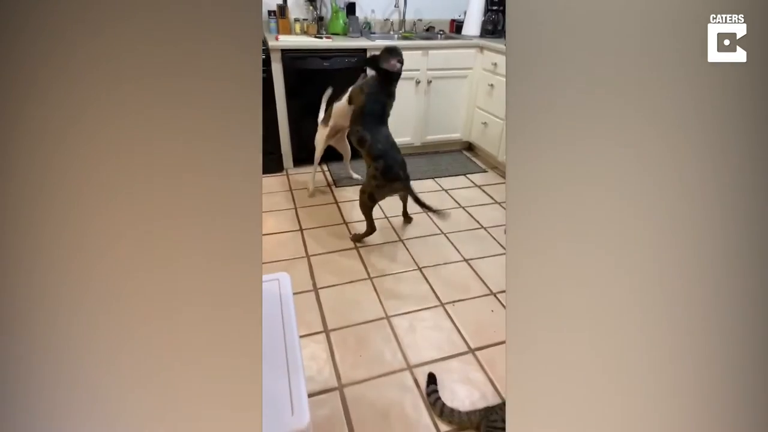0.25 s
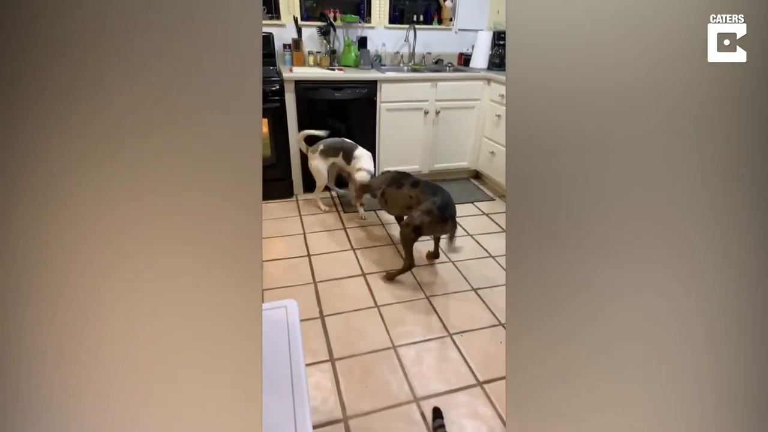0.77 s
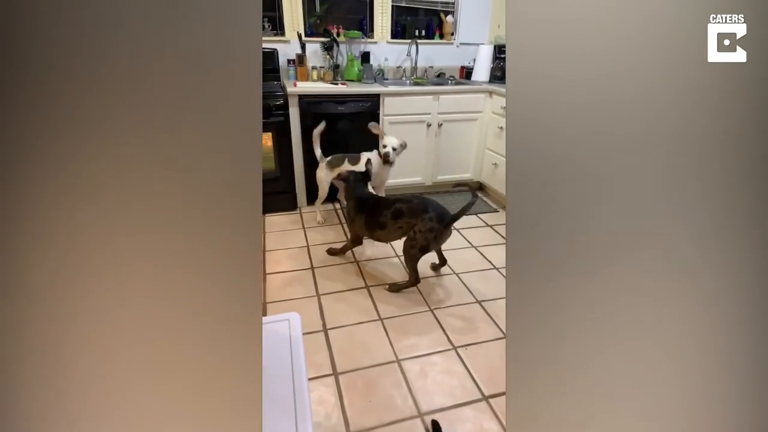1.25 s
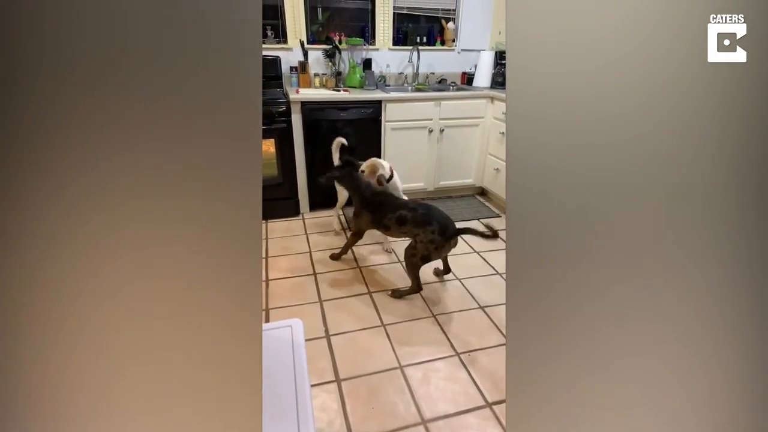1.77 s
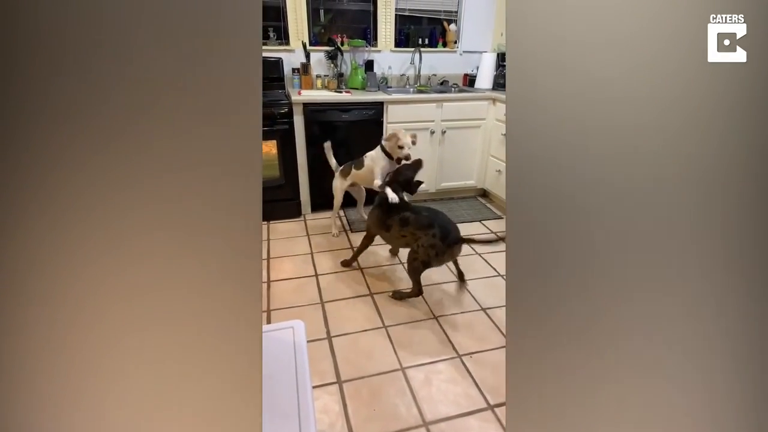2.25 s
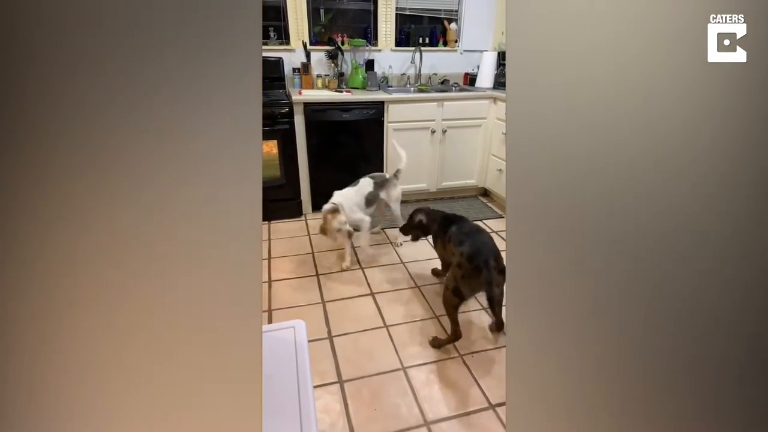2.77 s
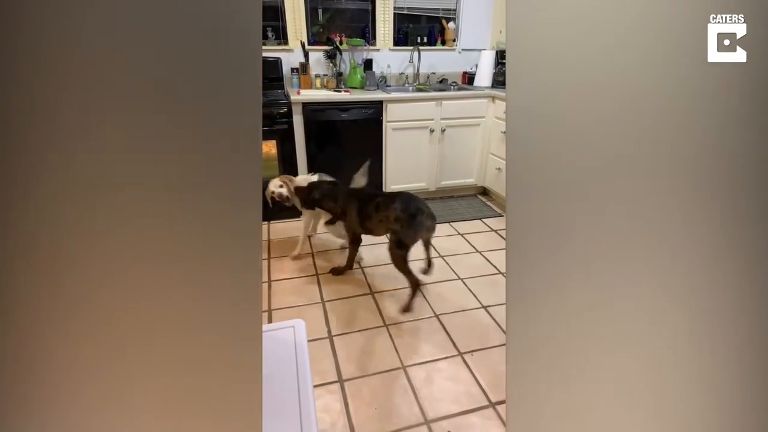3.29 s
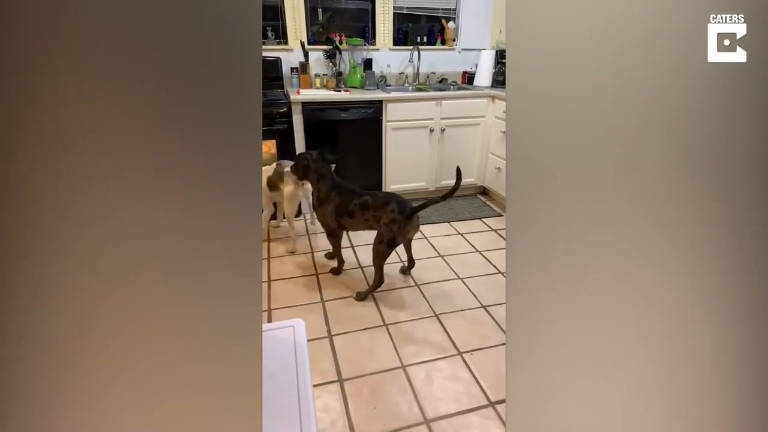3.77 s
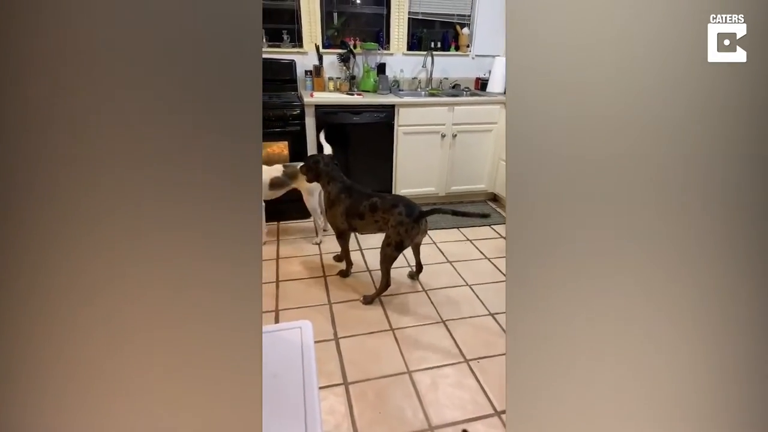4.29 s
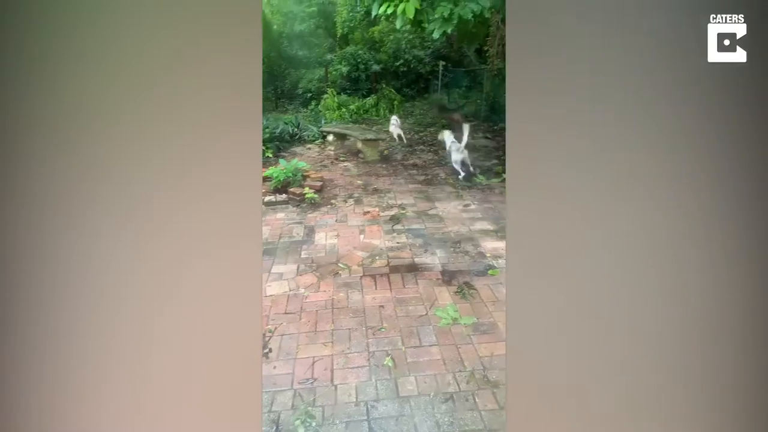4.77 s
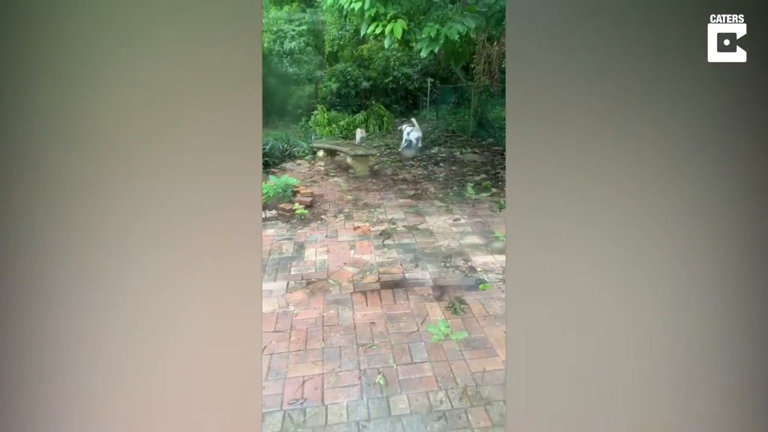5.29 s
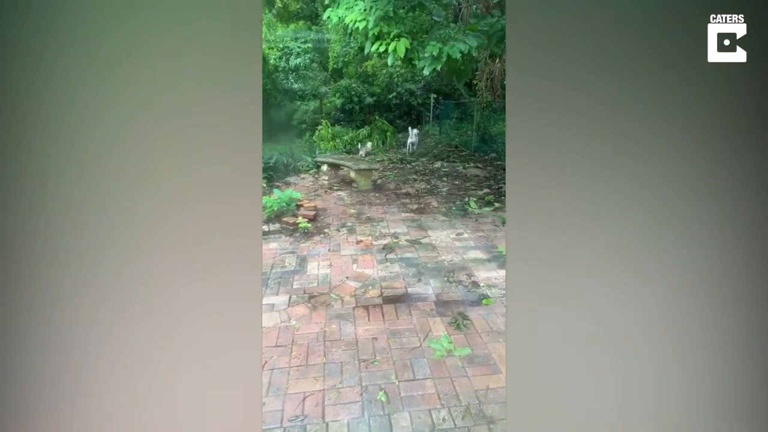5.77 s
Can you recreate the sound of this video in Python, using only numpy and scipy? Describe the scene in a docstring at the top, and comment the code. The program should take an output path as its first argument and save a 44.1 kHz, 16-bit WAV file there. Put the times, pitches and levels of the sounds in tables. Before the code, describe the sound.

Two dogs play-fight on a tiled kitchen floor near the microphone. Claws clack in uneven bursts, paws thud and slide, and brief, thin whimpers slip in between. Landings ring in hollow cabinets, with a short room echo and a low appliance hum. The kitchen fades out, and after an instant of silence a quiet yard cuts in with a droning machine, two distant yelps and faint rustling leaves.

```python
"""Claws clack and paws scuff on kitchen tile as two dogs wrestle, one giving thin, whistling whimpers.
Nails tick and ring, pads thud, and each landing booms in the hollow cabinets; the hard walls echo
and an appliance hums underneath. The kitchen fades out and, after a breath of silence, a quiet yard
cuts in: a droning machine, two far yelps and dogs bounding through rustling leaves."""
import sys
import numpy as np
from scipy import signal
from scipy.fft import rfft, irfft, next_fast_len
from scipy.io import wavfile
from scipy.ndimage import uniform_filter1d

SR = 44100
rng = np.random.default_rng(int(sys.argv[2]) if len(sys.argv) > 2 else 0)


def materialize(psi):
    """Save the field psi as 16-bit PCM at rate SR to the path in sys.argv[1].

    A 1-D psi becomes a single channel; in a 2-D psi each row is a channel.
    """
    bounded = np.clip(np.atleast_2d(psi).T, -1, 1)
    quanta = np.round(bounded * 32767).astype(np.int16)
    wavfile.write(sys.argv[1], SR, quanta)


N = 266364
TIME = np.arange(N) / SR

# Event levels are pre-fader: each layer gets its own gain in the mix.
# claws striking tile: (time [s], level [dB], scrape time [s], dullness as knock over tick [dB])
CLAW_HITS = [(0.001, -50.5, 0.0041, 15), (0.175, -47, 0.0044, -1), (0.244, -58.5, .009, 2),
             (0.3271, -62.5, .009, -17), (0.362, -62.5, 0.0071, 15.5), (0.585, -37, 0.018, 2.5),
             (0.659, -37, 0.0068, 6), (0.7548, -35.5, 0.004, -2), (1.0178, -25, 0.0072, -1),
             (1.178, -54, 0.0085, 14), (1.262, -65, 0.0078, 15.5), (1.379, -56.5, 0.012, 10.5),
             (1.4247, -62, 0.0072, -15), (1.4665, -49, 0.0035, 8.5), (1.66, -62, 0.08, 4),
             (2.0228, -35.5, 0.0094, -2), (2.132, -29, 0.0071, -1.5), (2.523, -53.5, 0.017, 6),
             (2.643, -33.5, 0.0046, 4.5), (2.679, -51, 0.011, 17), (2.765, -51.5, 0.018, -14),
             (2.793, -34.5, 0.013, 6.5), (3.147, -45, 0.0069, 2.5), (3.3421, -33, 0.0068, 0),
             (3.376, -45, 0.009, 15), (3.424, -47, 0.0058, 9), (3.4809, -35, 0.0015, 5),
             (3.526, -34, 0.0076, 2.5), (3.6201, -47.5, .011, 5.5), (3.6687, -47, 0.0092, 3),
             (3.7298, -42.5, 0.0058, 3), (3.83, -36, 0.0063, 2.5), (3.842, -43.5, 0.0062, 3.5),
             (4.2708, -65.5, .007, 21.5)]
# paw pads landing: (time [s], level [dB], resonance [Hz])
PAW_LANDINGS = [(0.147, -40, 406), (0.593, -44, 290), (0.6627, -43.5, 317), (1.0289, -39, 340),
                (1.2574, -50.5, 500), (1.468, -46.5, 507), (1.491, -49.5, 630), (2.1393, -42.5, 336),
                (2.351, -47.5, 330), (2.672, -47.5, 390), (2.8007, -48.5, 288), (2.956, -41.5, 332),
                (3.34, -50.5, 368), (3.423, -46, 338), (3.482, -45, 510), (3.654, -47.5, 650),
                (3.951, -57, 400)]
# feet and coats sliding: (peak time [s], swell time [s], swish level [dB], grit level [dB])
SLIDES = [(0.06, 0.14, -71, -61), (0.201, 0.16, -52, -64), (0.50, 0.052, -54, -70), (0.70, 0.084, -47, -69),
          (0.88, 0.056, -57, -60.5), (1.119, 0.09, -55, -50), (1.28, 0.017, -47, -57),
          (1.405, 0.043, -51, -67), (1.70, .04, -52, -59.5), (1.954, 0.084, -53.5, -58.5),
          (2.06, 0.11, -56, -54), (2.20, .04, -50, -66), (2.404, 0.049, -51.5, -56),
          (2.575, 0.064, -49, -52.5), (2.685, 0.067, -43.5, -60), (2.77, .04, -53, -52),
          (2.925, 0.044, -47.5, -49.5), (3.01, 0.049, -57.5, -64), (3.205, 0.078, -52, -67),
          (3.305, 0.047, -73, -59.5), (3.411, 0.067, -49, -49), (3.555, 0.056, -51, -58),
          (3.71, 0.069, -61, -51), (3.88, 0.063, -68, -54), (4.28, 0.059, -56.5, -80),
          (4.45, 0.086, -77, -72.5)]
# dog calls, near and far: (time [s], length [s], pitch [Hz], glide [Hz], level [dB], overtones [dB])
KITCHEN_WHIMPERS = [(0.0, 0.014, 1174, -38, -47, -9), (0.121, 0.087, 920, -28, -53, -21),
                    (0.44, 0.046, 974, -36, -52.5, -17.5), (0.635, 0.056, 1072, -33, -46, -20),
                    (0.843, 0.052, 1036, -36, -51, -21.5), (0.958, 0.12, 1104, 39.5, -51, -11.5),
                    (1.64, 0.075, 1134, -17, -53, -17.5), (1.874, .12, 1162, 28, -53, -0.5),
                    (2.352, 0.072, 1145, 6, -58.5, 4.5), (2.522, 0.042, 977, 44, -50, -25),
                    (2.575, 0.064, 1118, -22, -42.5, -13.5), (2.696, 0.04, 1080, -84, -51, -27.5),
                    (2.865, .11, 1169, -60.5, -48, -5), (3.17, 0.082, 950, -100, -53, -32.5),
                    (3.323, 0.054, 1224, 25, -43.5, -9.5), (3.395, 0.058, 1265, 10, -46, -11.5),
                    (3.441, 0.031, 873, -4, -45.5, -18), (3.70, .08, 1252, -12, -40.5, -11.5),
                    (3.765, .06, 1245, -8, -45.5, -27), (4.567, 0.06, 1300, 49, -41, -9)]
YARD_YELPS = [(4.68, 0.091, 595, -47, -60.5, -21), (4.915, 0.068, 611, -75, -63, -21)]
# far bounds through leaves: (peak time [s], swell time [s], level [dB])
LEAF_BOUNDS = [(4.75, 0.049, -64.5), (4.92, 0.036, -68.5), (5.01, .03, -78), (5.11, .03, -82),
               (5.34, 0.061, -73.5), (5.46, 0.028, -76), (5.73, .03, -83.5)]
# tone colours of the contacts and the background beds: (frequency [Hz], relative level [dB])
NAIL_TICK_EQ = [(200, -35), (1000, -18), (2500, -10), (4000, -5), (5500, -4), (6800, 3), (8400, -6.5),
                (10000, -32)]
NAIL_KNOCK_EQ = [(100, -33), (280, -2), (700, -3), (1200, 1), (2100, 2.5), (3200, -1.5), (4500, -8.5),
                 (9000, -33.5)]
FUR_SWISH_EQ = [(100, -33.5), (250, -8.5), (430, -3), (680, -5), (1050, -1), (1450, -7.5), (2300, -14),
                (4000, -25.5), (9000, -35)]
TILE_GRIT_EQ = [(500, -25.5), (1500, -0.5), (2400, 0), (3600, -5.5), (5400, -5), (6800, 1), (8200, -11),
                (10000, -11)]
LEAF_RUSTLE_EQ = [(200, -13), (600, -2), (1000, -1), (1500, 1), (2100, -3.5), (2800, -9.5), (4000, -24.5),
                  (7000, -18.5), (9000, -27.5)]
ROOM_TONE_EQ = [(15, -8), (45, 4), (70, 4), (100, 3), (180, -0.5), (350, -9), (700, -16), (1500, -33.5),
                (4000, -38.5), (9000, -45)]
YARD_RUMBLE_EQ = [(15, -48.5), (25, -6), (70, -12), (124, -4.5), (147, -11.5), (175, -17), (308, -25.5),
                  (414, -25.5), (911, -42), (1290, -36), (1530, -49), (4860, -63), (6860, -58.5),
                  (9000, -67.5), (11700, -104), (19800, -120)]
# low modes of the hollow cabinets: (frequency [Hz], relative level [dB], time to fall 60 dB [s])
CABINET_MODES = [(269, -8, .21), (350, -12, .16), (431, -2, .36), (478, -6, .34), (525, -4, .2)]
# kitchen reverb: (frequency [Hz], time to fall 60 dB [s])
WALL_DECAY = [(150, 0.24), (500, 0.38), (1400, 0.38), (3500, 0.4), (8000, 0.28)]
# steady hums, indoors and out: (frequency [Hz], level [dB])
APPLIANCE_TONES = [(120, -54), (239.8, -77), (431, -81)]
YARD_MACHINE_TONES = [(60, -60.5), (119.8, -46), (239, -68), (357.3, -74), (416, -70), (479.6, -81),
                      (534.6, -76.5), (653, -77.5), (1249, -74.5), (1308, -69), (1427, -86.5), (3801, -100)]


def claws(nail_hz=2444, dull_db_per_octave=17.5, min_rise_s=.00052, grain_db=1.5):
    """Nails strike tile: a bright, grainy tick, a duller knock and a short ring."""
    t = np.arange(SR // 6) / SR
    tick, knock, ring = np.zeros((3, N))
    for s, db, scrape_s, dull_db in CLAW_HITS:
        rise_s = min_rise_s + .24 * scrape_s  # longer scrapes have a softer attack
        ring_hz = nail_hz * 2 ** (-dull_db / dull_db_per_octave)  # duller hits ring lower
        envelope = np.minimum(t / rise_s, 1) * np.exp(-(np.maximum(t - rise_s, 0) / scrape_s) ** 2)
        rms = np.sqrt(np.mean(envelope ** 2))
        tick_noise, knock_noise, ring_noise = envelope * rng.standard_normal((3, len(t)))
        grain = amp(grain_db * wander(820, len(t)))
        add(tick, s, amp(db - dull_db / 2) * rms * unit(tick_noise * grain))
        add(knock, s, amp(db + dull_db / 2) * rms * unit(knock_noise))
        add(ring, s, amp(db + dull_db / 2) * rms * unit(band(ring_noise, ring_hz, damping=.2)))
    return (amp(-1) * colour(tick, NAIL_TICK_EQ) + amp(-5.5) * colour(knock, NAIL_KNOCK_EQ)
            + amp(-10) * ring)


def paws(attack_s=.00675):
    """Pads thud: a short, soft push into a heavily damped low resonance."""
    t, out = np.arange(SR // 5) / SR, np.zeros(N)
    push = t / attack_s * np.exp(1 - t / attack_s)
    for s, db, hz in PAW_LANDINGS:
        thud = band(push * rng.standard_normal(len(t)), hz, damping=.4)
        add(out, s, amp(db) * thud * np.linalg.norm(push) / np.linalg.norm(thud))
    return out


def scuffle(grains_per_s=3000, still_s=3.95, settle_s=.05):
    """Pads and fur swish in uneven strokes while dragging nails add a fine grit."""
    clumps = amp(2.5 * wander(30, N))
    swish = patchy(colour(rng.standard_normal(N) * clumps, FUR_SWISH_EQ), patch_db=3)
    grains = rng.standard_normal(N) * amp(3 * np.minimum(rng.exponential(1, N), 4))
    grains *= rng.random(N) < grains_per_s / SR
    grit = patchy(colour(grains * clumps, TILE_GRIT_EQ), patch_db=4)
    s, swell_s, swish_db, grit_db = np.transpose(SLIDES)
    shuffling = (1 - np.tanh((TIME - still_s) / settle_s)) / 2  # dies as the dogs come to a stand
    return (swish * strokes(zip(s, swell_s, swish_db), floor=amp(-64) * shuffling)
            + grit * strokes(zip(s, swell_s, grit_db), floor=amp(-76) * shuffling))


def whimpers(calls, jitter, flutter=.65, rough_at_1khz=.65):
    """Thin nasal whistles: the lower the call, the more roughness shakes its pitch and loudness."""
    out = np.zeros(N)
    for s, length_s, pitch_hz, glide_hz, db, overtone_db in calls:
        n = int(length_s * SR)
        rough = min(rough_at_1khz * (1000 / pitch_hz) ** 3.8, 1)
        contour_hz = pitch_hz + glide_hz * np.linspace(-.5, .5, n)
        hz = contour_hz * (1 + jitter * rough * wander(180, n))
        phase = 2 * np.pi * np.cumsum(hz) / SR
        upper = sum(np.sin(k * phase) for k in (4, 5, 6))
        rasp = unit(sum(band(rng.standard_normal(n), k * pitch_hz, damping=.05) for k in (2, 3)))
        overtones = np.sin(2 * phase) + amp(-5) * np.sin(3 * phase) + amp(-17) * upper + amp(-14) * rasp
        voice = np.sin(phase) + amp(overtone_db) * overtones
        envelope = signal.windows.tukey(n, .5) * unit(1 + flutter * rough * wander(130, n))
        add(out, s, np.sqrt(2) * amp(db) * envelope * voice)
    return out


def cabinets(rise_s=.007, coupling_db=-15.5, bump_s=2.1395, bump_db=-36):
    """Paw landings, and one body bump, set the hollow cabinets booming at their low modes."""
    t, out = np.arange(SR // 2) / SR, np.zeros(N)
    ring = sum(amp(db - 60 * t / t60) * np.sin(2 * np.pi * hz * t) for hz, db, t60 in CABINET_MODES)
    ring *= 1 - np.exp(-t / rise_s)
    for s, db, _ in PAW_LANDINGS:
        add(out, s, amp(db + coupling_db) * ring)
    add(out, bump_s, amp(bump_db) * ring)
    return out


def wall_echoes(send, predelay_s=.0028, echoes_per_s=4000, patterns=4, shifts_per_s=5):
    """Hard walls: dense echoes die band by band, their pattern shifting as the dogs move about."""
    size, out = SR * 3 // 4, np.zeros(N)
    for k in range(patterns):
        taps = rng.standard_normal(size) * (rng.random(size) < echoes_per_s / SR)
        taps *= np.arange(size) > predelay_s * SR
        hz, t, bands = signal.stft(taps, SR, nperseg=256)
        decay = amp(-60 * t / curve_at(WALL_DECAY, hz)[:, None])
        tail = signal.istft(bands * decay, SR, nperseg=256)[1]
        away = abs((TIME * shifts_per_s - k) % patterns - patterns / 2)
        crossfade = np.cos(np.pi / 2 * np.minimum(away, 1))
        out += signal.oaconvolve(send * crossfade, tail / np.linalg.norm(tail))[:N]
    return out


def leaves():
    """Far-off dogs run through leaves: a flickering rustle swells with each bound."""
    flicker = rng.standard_normal(N) * amp(2 * wander(50, N))
    rustle = patchy(colour(flicker, LEAF_RUSTLE_EQ), patch_db=2.5)
    return rustle * strokes(LEAF_BOUNDS, floor=amp(-92.5))


def machine_hum(tones, waver, drift_hz):
    """A running machine: steady tones that waver slightly in level and pitch."""
    drift_cycles = drift_hz * np.cumsum(wander(.77, N)) / SR
    return sum(np.sqrt(2) * amp(db) * (1 + waver * wander(12, N))
               * np.sin(2 * np.pi * (hz * TIME + drift_cycles + rng.random())) for hz, db in tones)


def air(eq):
    """A steady bed of shaped noise, rms 1."""
    size = 2 * next_fast_len(N // 2 + 1)
    gain = amp(curve_at(eq, np.fft.rfftfreq(size, 1 / SR)))
    return unit(irfft(rfft(rng.standard_normal(size)) * gain)[:N])


def strokes(rows, floor, release_ratio=1.15):
    """Envelope of sliding strokes: each swells, then dies a little more slowly, over a low floor."""
    power = floor ** 2
    for s, swell_s, db in rows:
        from_peak = (TIME - s) / np.where(TIME < s, swell_s, swell_s * release_ratio)
        power = power + amp(db) ** 2 / (1 + from_peak ** 2 / 2) ** 4
    return np.sqrt(power)


def patchy(x, patch_db, frames=9, bins=4):
    """Rubbing contacts keep shifting, so brief resonances come and go in the noise."""
    bands = signal.stft(x, SR, nperseg=512, noverlap=384)[2]
    patches = rng.standard_normal(bands.shape)
    for _ in range(2):
        patches = uniform_filter1d(uniform_filter1d(patches, frames, axis=1), bins, axis=0)
    gain = amp(patch_db * np.clip(unit(patches), -2, 2))
    return unit(signal.istft(bands * gain, SR, nperseg=512, noverlap=384)[1][:N])


def band(x, hz, damping):
    """A resonance around hz; more damping widens it."""
    edges_hz = [hz / (1 + damping), hz * (1 + damping)]
    return signal.sosfilt(signal.butter(2, edges_hz, "band", fs=SR, output="sos"), x)


def colour(x, eq, size=2048):
    """Minimum-phase EQ of unit energy, which keeps attacks crisp."""
    log_gain = np.log(amp(curve_at(eq, abs(np.fft.fftfreq(size, 1 / SR)))))
    taps = np.fft.ifft(np.exp(np.conj(signal.hilbert(log_gain)))).real[:size // 2]
    return signal.oaconvolve(x, taps / np.linalg.norm(taps))[:len(x)]


def wander(rate_hz, size):
    """Smooth random modulation, rms about 1, moving at up to about rate_hz."""
    position = np.arange(size) / SR * rate_hz * 4
    knots = rng.standard_normal(int(position[-1]) + 200)
    smooth = uniform_filter1d(uniform_filter1d(knots, 3), 3)
    return np.interp(position, np.arange(len(smooth)), unit(smooth))


def curve_at(points, hz):
    """Reads a curve on a log-frequency axis."""
    point_hz, values = np.transpose(points)
    return np.interp(np.log(hz + 1), np.log(point_hz + 1), values)


def add(mix, s, sound):
    """Mixes a sound in at s seconds."""
    part = mix[max(round(s * SR), 0):][:len(sound)]
    part += sound[:len(part)]


def amp(db):
    """Decibels to gain."""
    return 10 ** (np.asarray(db) / 20)


def unit(x):
    """Scales to rms 1."""
    return x / np.sqrt(np.mean(x ** 2) + 1e-20)


def kitchen():
    """The dogs up front, cabinets and walls ringing behind them, hum and room tone underneath."""
    clack, thud, whine, rub = claws(), paws(), whimpers(KITCHEN_WHIMPERS, jitter=.055), scuffle()
    direct = clack + amp(-1) * thud + amp(-2.5) * whine + amp(-3) * rub
    send = amp(.5) * clack + amp(-5.5) * thud + amp(-6) * whine + amp(-10) * rub
    ringing = wall_echoes(send) + cabinets()
    hum = machine_hum(APPLIANCE_TONES, waver=.08, drift_hz=.4)
    return direct + ringing + hum + amp(-57) * air(ROOM_TONE_EQ)


def yard():
    """A machine drones over low outdoor rumble; far off, leaves rustle and two yelps sound."""
    rustle = leaves()
    drone = machine_hum(YARD_MACHINE_TONES, waver=.15, drift_hz=.3)
    rumble = amp(-52.5) * air(YARD_RUMBLE_EQ)
    return drone + rumble + rustle + whimpers(YARD_YELPS, jitter=.14)


def scene(kitchen_end_s=4.618, fade_s=.68, yard_start_s=4.66, cut_s=.0016):
    """The kitchen fades out; after a moment of silence the yard cuts in."""
    fade_out = np.clip((kitchen_end_s - TIME) / fade_s, 0, 1) ** .94
    cut_in = np.clip((TIME - yard_start_s) / cut_s, 0, 1)
    return (kitchen() * fade_out + yard() * cut_in)[None]


def record(dry, notch_hz=4830, notch_db=-22, shelf_hz=8900, shelf_db=-22, cutoff_hz=9920):
    """Master EQ: a narrow treble notch, a high shelf cut and a steep low-pass."""
    hz = np.linspace(0, SR / 2, 1025)
    notch = notch_db * np.exp(-((hz - notch_hz) / 270) ** 2)
    shelf = shelf_db * (1 + np.tanh((hz - shelf_hz) / 130)) / 2
    eq = signal.firwin2(1023, hz, amp(notch + shelf), fs=SR)
    lowpass = signal.firwin(255, cutoff_hz, window=("kaiser", 8), fs=SR)
    return signal.oaconvolve(dry, np.convolve(eq, lowpass)[None], "same")


dry = scene()
out = record(dry)
materialize(out)
```